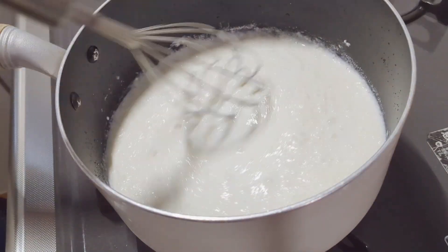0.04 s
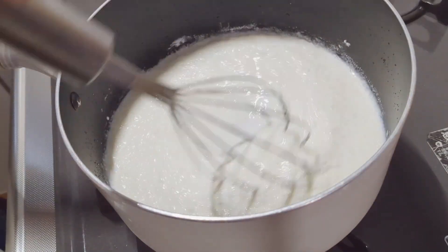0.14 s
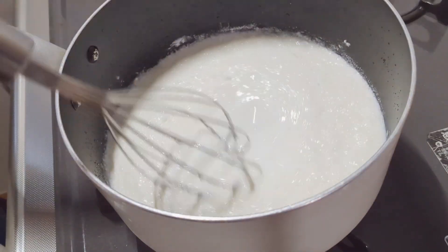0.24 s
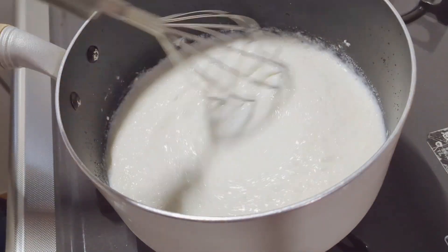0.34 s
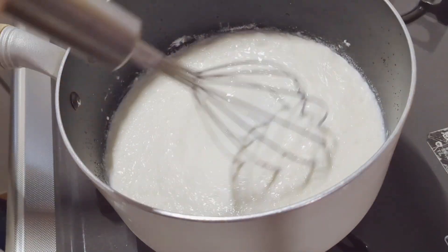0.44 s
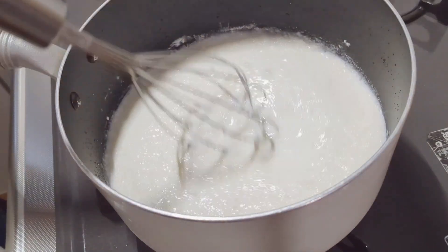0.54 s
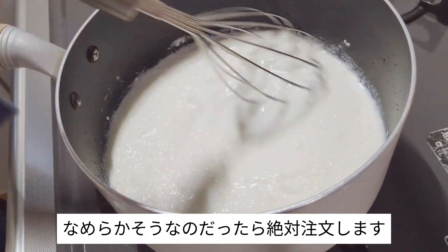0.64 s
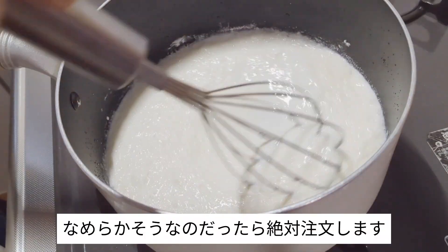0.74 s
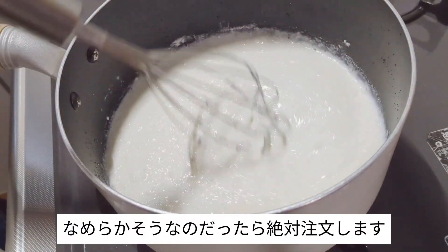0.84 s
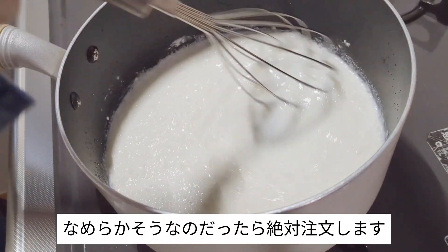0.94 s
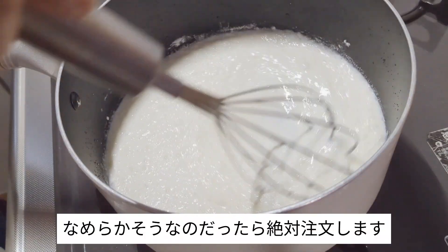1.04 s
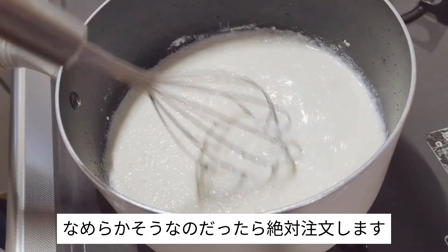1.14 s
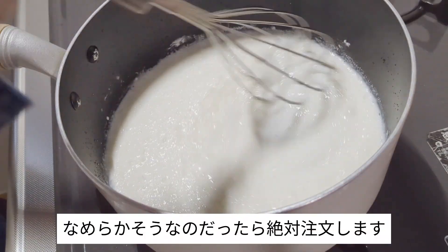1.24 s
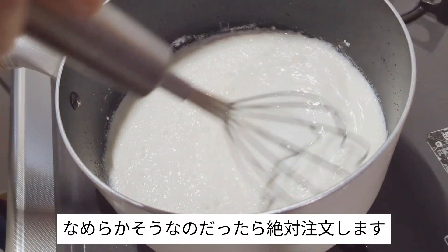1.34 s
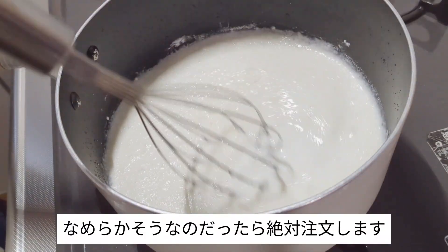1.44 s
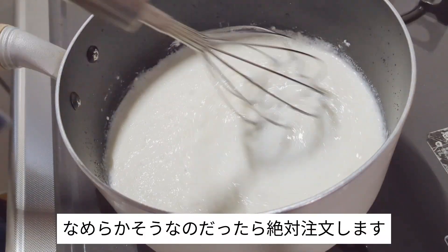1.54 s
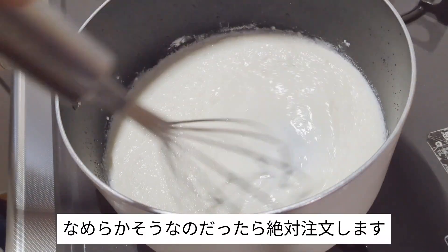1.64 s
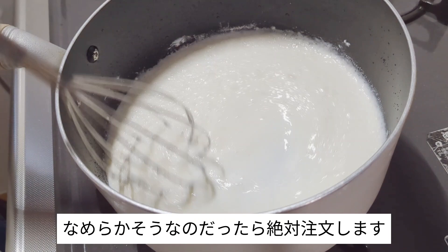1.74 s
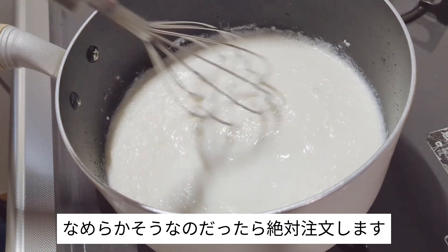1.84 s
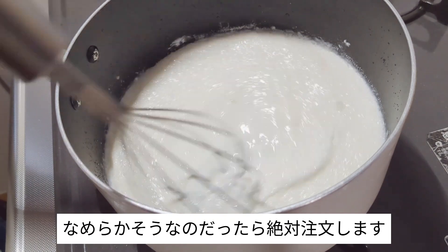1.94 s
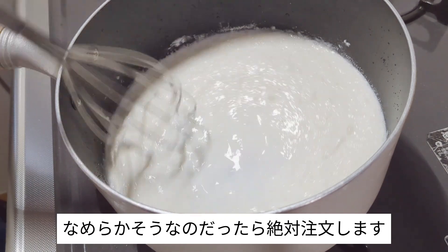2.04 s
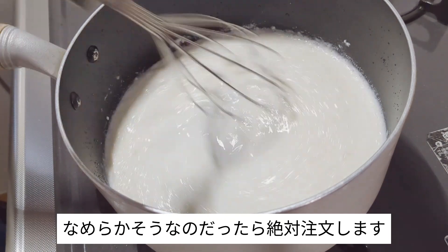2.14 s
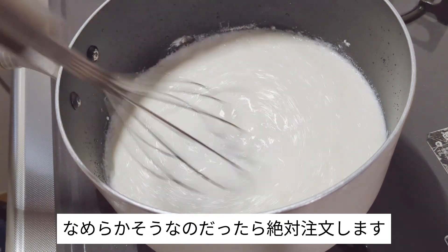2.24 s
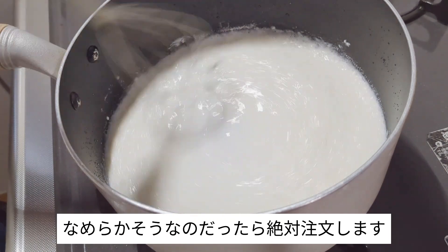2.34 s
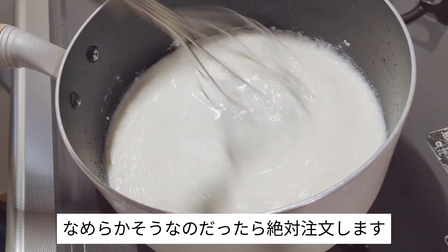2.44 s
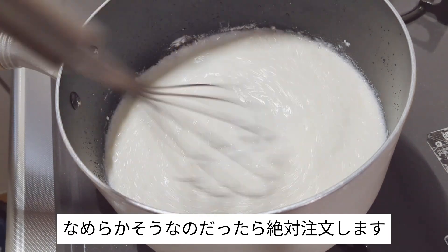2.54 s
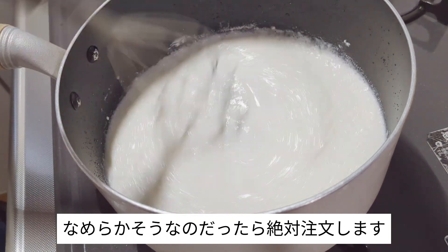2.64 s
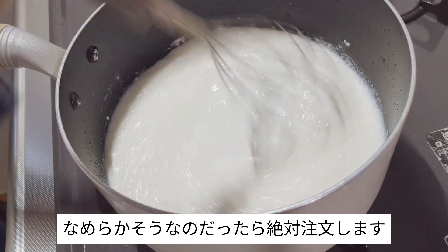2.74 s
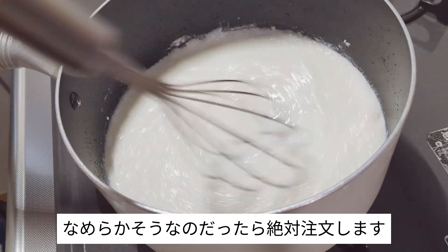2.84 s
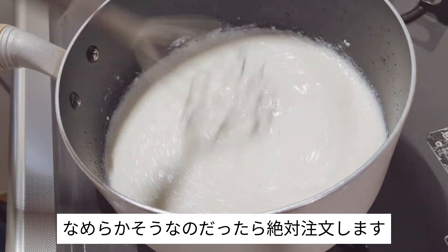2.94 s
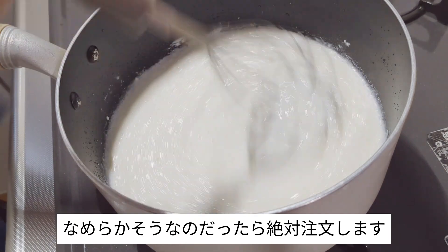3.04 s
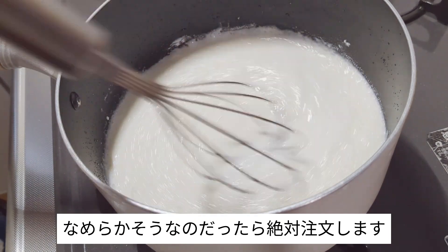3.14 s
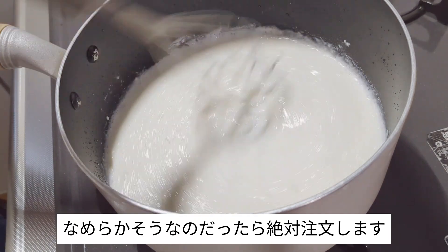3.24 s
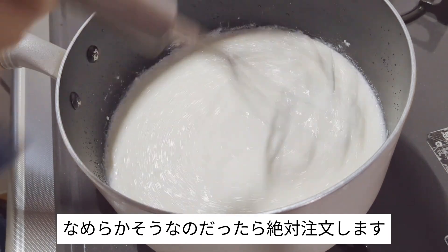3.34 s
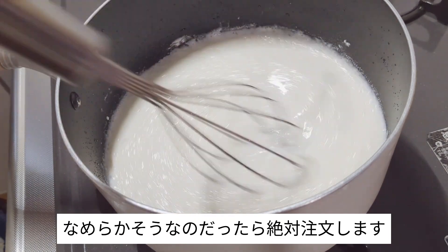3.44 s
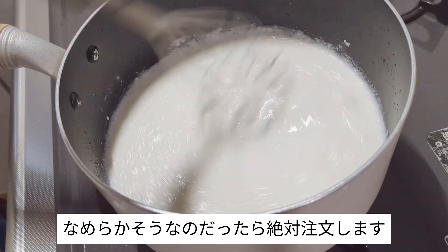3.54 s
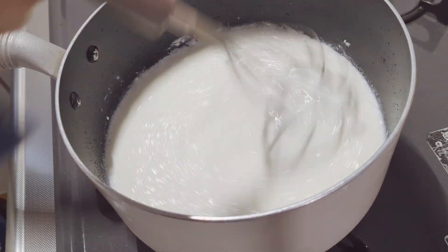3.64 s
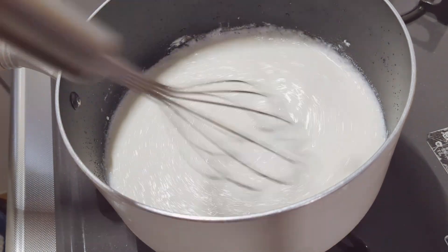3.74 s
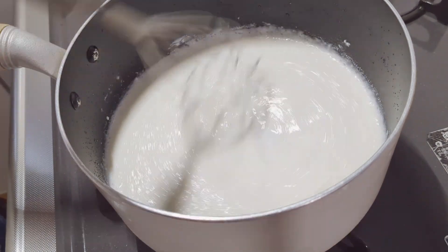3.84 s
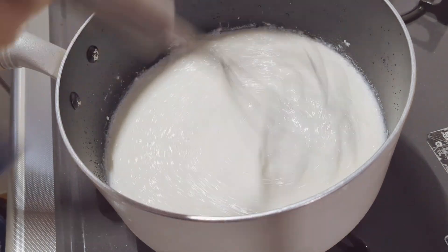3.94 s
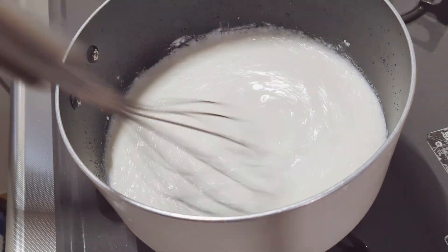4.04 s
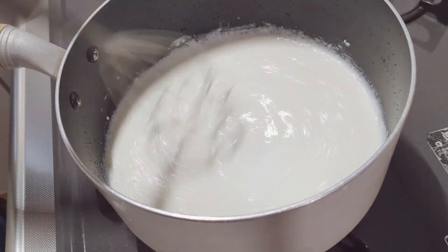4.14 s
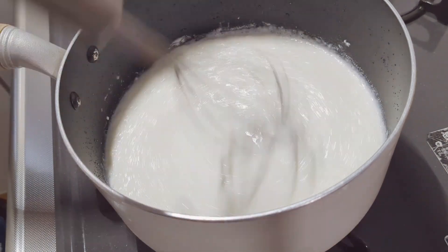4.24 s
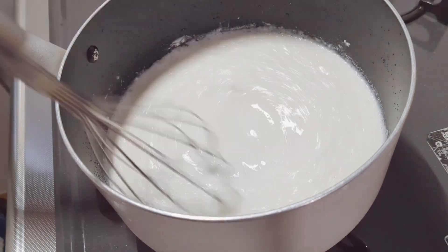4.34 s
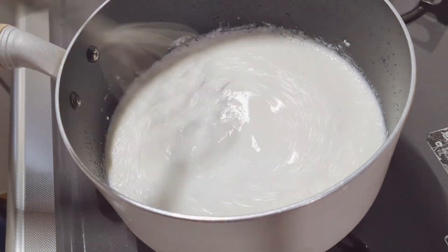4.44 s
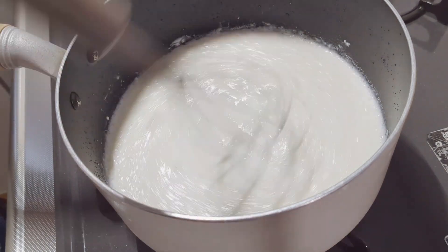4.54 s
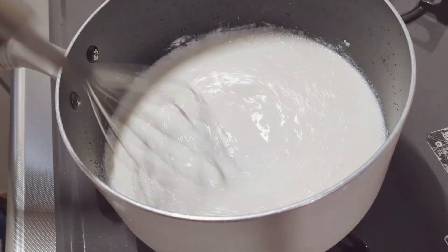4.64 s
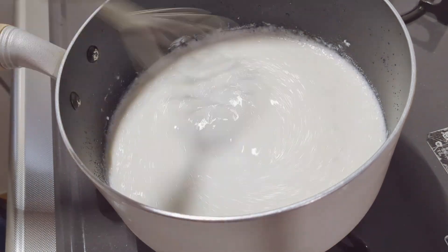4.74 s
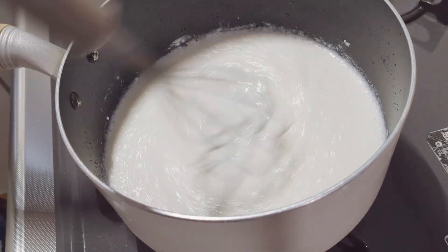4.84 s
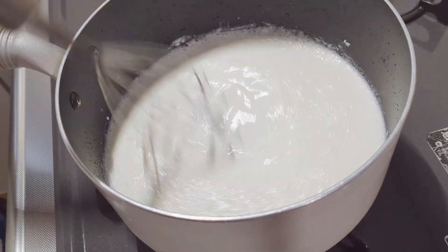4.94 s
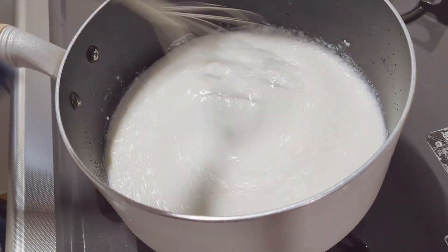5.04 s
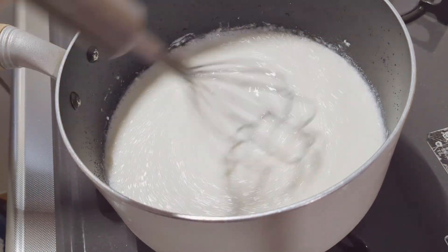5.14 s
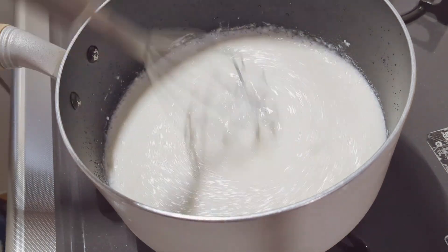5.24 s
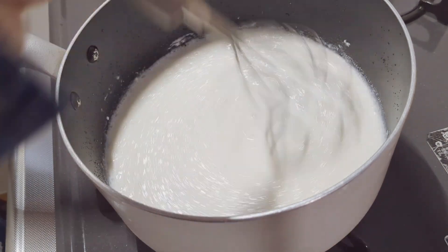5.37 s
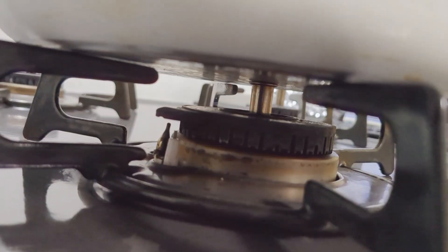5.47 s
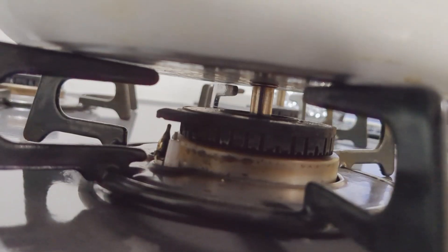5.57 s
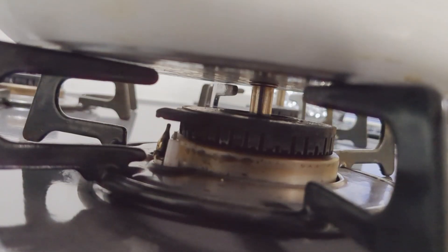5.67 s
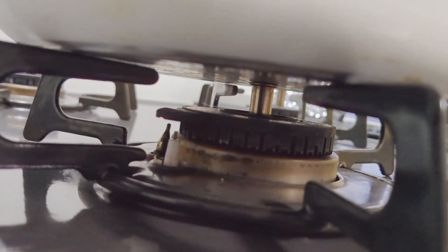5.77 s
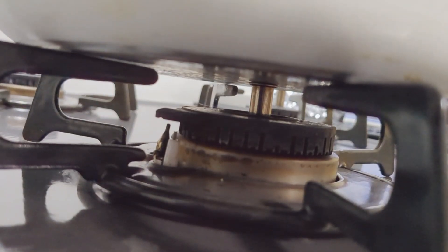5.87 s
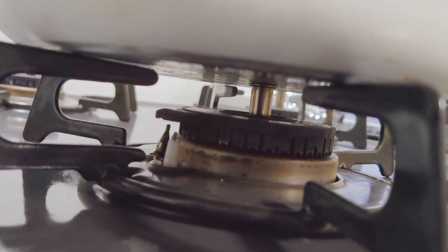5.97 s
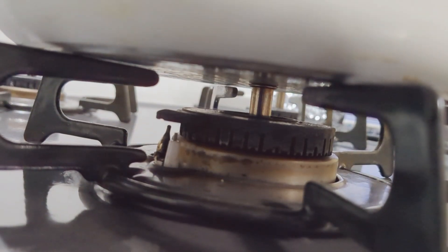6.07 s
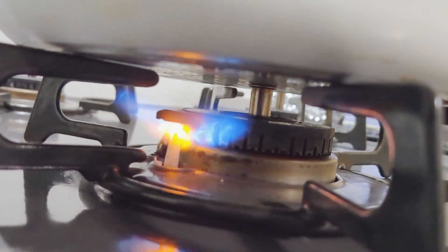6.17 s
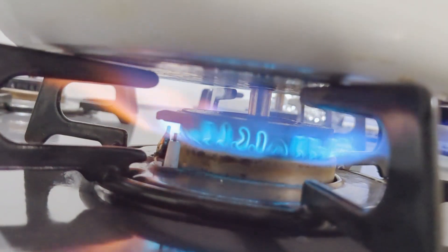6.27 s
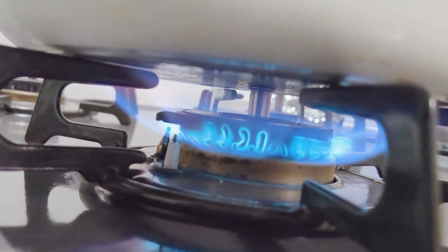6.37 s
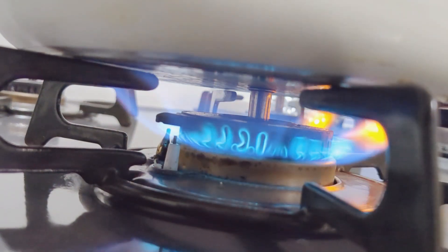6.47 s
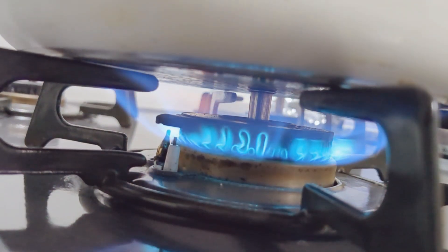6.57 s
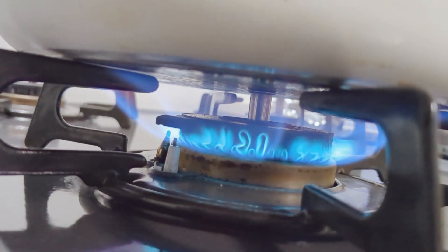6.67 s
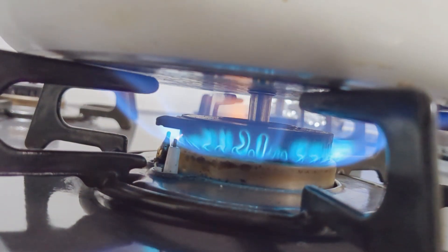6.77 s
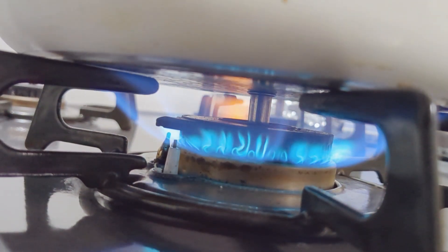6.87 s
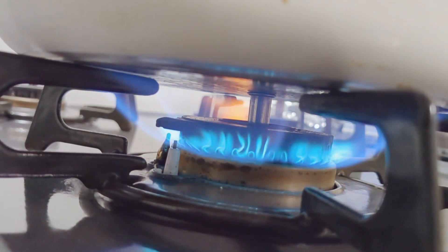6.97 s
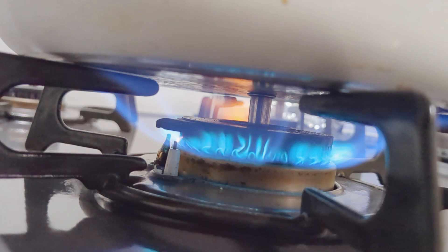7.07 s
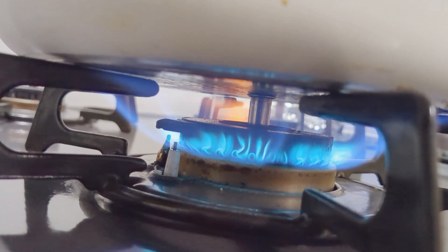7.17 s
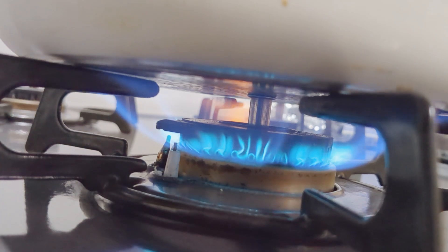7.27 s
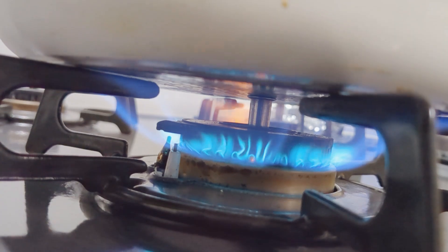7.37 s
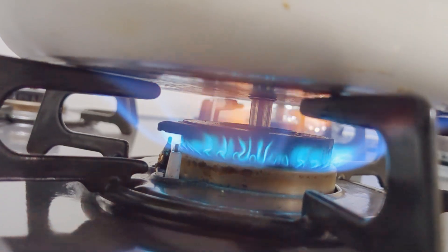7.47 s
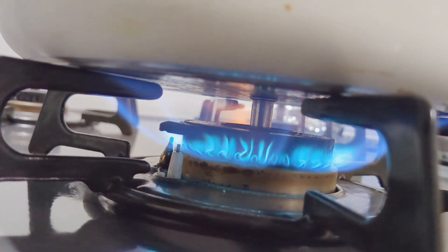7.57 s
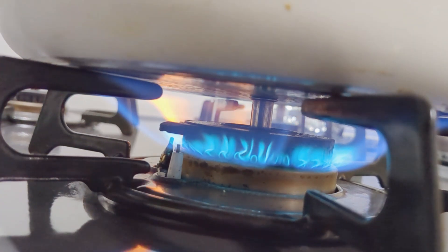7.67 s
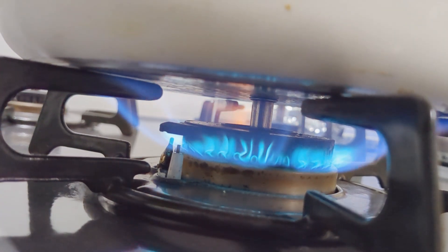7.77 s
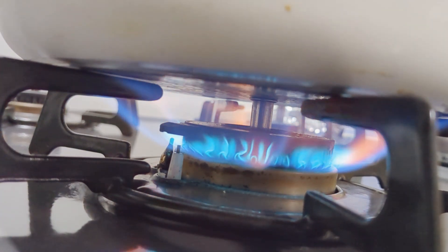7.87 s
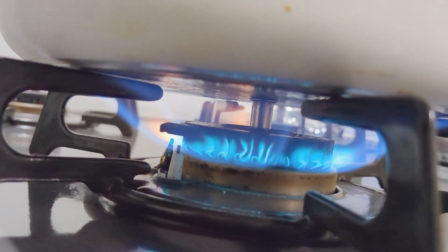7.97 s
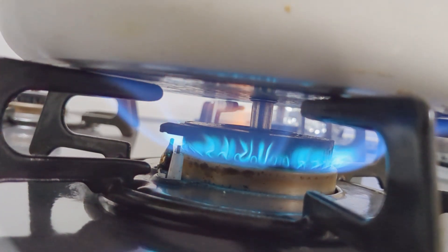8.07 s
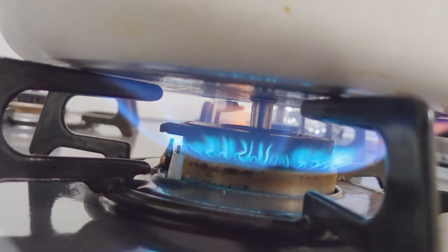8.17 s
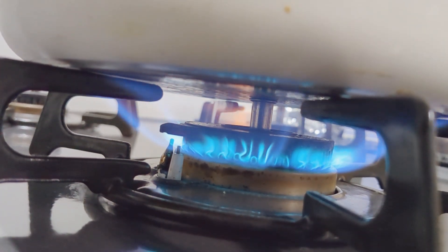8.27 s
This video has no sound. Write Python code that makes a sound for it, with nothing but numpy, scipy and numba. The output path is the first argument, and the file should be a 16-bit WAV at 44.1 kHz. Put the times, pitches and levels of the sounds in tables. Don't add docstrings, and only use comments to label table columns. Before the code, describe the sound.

Very close stereo pickup above a hob: short metallic scrapes of a whisk, pan wall humming, wires chattering against it and the pan jolting, becoming quicker and more regular. A tiny silence, then plastic and steel clacks booming in the casing, thin gas hiss, a hard ignition pop, regular loud spark cracks and a low settling flame roar.

```python
import sys
import numpy as np
from scipy import signal
from scipy.fft import rfft, irfft, next_fast_len
from scipy.io import wavfile
from scipy.ndimage import uniform_filter1d
from numba import njit

SR = 44100
rng = np.random.default_rng(int(sys.argv[2]) if len(sys.argv) > 2 else 0)


def materialize(psi):
    bounded = np.clip(np.atleast_2d(psi).T, -1, 1)
    quanta = np.round(bounded * 32767).astype(np.int16)
    wavfile.write(sys.argv[1], SR, quanta)


def gain_from_decibels(decibels):
    exponent = np.asarray(decibels, float) / 20
    return 10 ** exponent


N = 366471
T = np.arange(N) / SR
SIDES = np.array([[.5], [-.5]])
CUT_S, GAP_S = 5.474, .014

# start t/s, length t/s, pan hum level/dB, wire hiss
# level/dB, main wall mode f/Hz
STIRS = [(0.0, 0.17, -46.5, -55.5, 1230), (0.14, 0.078, -48.5, -46.5, 1262),
         (0.286, 0.17, -48.5, -55.5, 1270), (0.427, 0.096, -52.5, -47, 1250),
         (0.549, 0.16, -47.5, -52, 1273), (0.717, 0.088, -50.5, -45, 1185), (0.858, 0.13, -46.5, -48, 1310),
         (1, 0.038, -50, -46.5, 1190), (1.091, 0.083, -53.5, -47.5, 1304), (1.191, 0.069, -45, -44.5, 1360),
         (1.42, 0.0086, -47, -41, 1303), (1.457, 0.12, -45, -45.5, 1347), (1.614, 0.076, -45.5, -45, 1210),
         (1.721, 0.12, -47, -44.5, 1350), (1.849, 0.089, -48.5, -62, 1305), (1.93, 0.021, -51, -52, 1274),
         (2.009, 0.081, -45.5, -49, 1304), (2.074, 0.11, -46.5, -38.5, 1410),
         (2.27, 0.013, -46, -50.5, 1230), (2.31, 0.12, -46.5, -47, 1236), (2.478, 0.081, -44.5, -42, 1200),
         (2.618, 0.14, -48.5, -49, 1224), (2.79, 0.08, -54.5, -51, 1220), (2.854, 0.076, -52.5, -58, 1220),
         (2.938, 0.092, -45, -50, 1220), (3.042, 0.097, -49.5, -45, 1220), (3.14, 0.043, -55, -52, 1220),
         (3.221, 0.15, -47, -50.5, 1234), (3.379, 0.11, -54, -49.5, 1238), (3.508, 0.13, -46, -47.5, 1310),
         (3.668, 0.045, -61, -41.5, 1200), (3.778, 0.0079, -43, -49.5, 1280),
         (3.832, 0.093, -45, -45.5, 1238), (3.968, 0.083, -52, -44.5, 1210),
         (4.088, 0.13, -46, -45.5, 1218), (4.388, .12, -45.5, -48.5, 1271),
         (4.52, 0.029, -50.5, -48.5, 1236), (4.653, 0.1, -45, -44.5, 1220),
         (4.818, 0.038, -45.5, -44.5, 1260), (4.928, 0.13, -46, -51, 1178),
         (5.11, 0.044, -45.5, -33.5, 1144), (5.201, 0.049, -45.5, -49, 1230),
         (5.281, 0.085, -44, -50, 1214), (5.413, 0.034, -46.5, -39, 1230)]
DRAGS = STIRS
# t/s, peak level/dB, chatter t60/s, left minus right level/dB
CLINKS = [(1.025, -23, 0.14, 4), (1.4301, -23, 0.023, 4), (1.8195, -19.5, 0.12, 2),
          (2.014, -28.5, 0.072, 3), (2.0855, -13, 0.065, 1), (2.0947, -11, 0.032, 14),
          (2.1017, -23.5, 0.047, -3), (2.113, -12, 0.03, -5), (2.145, -14, 0.03, -3),
          (2.152, -17, 0.02, 1.5), (2.4733, -10.5, 0.074, 1), (2.7898, -18, 0.058, 4),
          (3.0897, -17, 0.056, 1.5), (3.3864, -20, 0.054, 5), (3.6776, -15.5, 0.08, 1),
          (4.4, -30.5, 0.055, 3.5), (4.6591, -26.5, 0.046, -0.5), (4.832, -31.5, 0.014, 3),
          (4.9355, -32, 0.067, 3), (5.1115, -9, 0.097, 3), (5.1282, -4, 0.032, -2.5),
          (5.222, -24.5, 0.03, 3.5), (5.4254, -17, 0.072, 1)]
# f/Hz, width f/Hz, level/dB, share of the bending as milk and wires load the wall
PAN = [(265.6, 14, -19, 0.66), (508.7, 40.6, -8, -.2), (674, 51, -5.5, 0.48), (1038, 65, -5, -0.35),
       (1080, 210, -15.5, 0.81), (1220, 82, -1.5, 1), (1469, 320, -11.5, -0.14), (1657, 67, -8, -0.095),
       (1810, 110, -11, 0.6), (2040, 141, -10.5, 0.11), (2461, 130, -23.5, 0), (2636, 124, -8, 0.37),
       (3007, 230, -11.5, 0.38), (4155, 69, -9.5, -0.16)]
# f/Hz, t60/s
HOB_TAIL = [(500, 0.082), (1300, 0.18), (3000, 0.33), (8000, 0.26), (16000, 0.2)]


def unit(x):
    return x / np.sqrt(np.mean(x ** 2))


def colour(x, shape):
    size = next_fast_len(x.shape[-1])
    f, db = np.transpose(shape)
    hz = np.maximum(np.arange(size // 2 + 1) * SR / size, 1)
    gain = gain_from_decibels(np.interp(np.log(hz), np.log(f), db))
    return irfft(rfft(x, size) * gain, size)[..., :x.shape[-1]]


def noise(shape, alike):
    mid, side = unit(colour(rng.standard_normal((2, N)), shape))
    alike = np.clip(alike, 0, 1)
    return np.sqrt((1 + alike) / 2) * mid + np.sqrt((1 - alike) / 2) * side * 2 * SIDES


def walk(rate, count=1, step=1):
    k = max(int(SR / rate / step), 1)
    size = -(-N // step)
    held = np.repeat(rng.standard_normal((count, N // 300))[:, :size // k + 1], k, axis=1)
    return 1.5 * uniform_filter1d(uniform_filter1d(held, k), k)[:, :size]


def bursts(s, db, t60, rise=0.000065):
    out = np.zeros(N)
    for start, gain, length in zip(s, gain_from_decibels(np.asarray(db)), np.clip(t60, .004, .6)):
        i = int(start * SR)
        t = np.arange(min(int(length * SR), N - i)) / SR
        out[i:i + len(t)] += gain * (1 - np.exp(-t / rise)) * 1000 ** (-t / length)
    return out


def knocks(s, db, hz, t60, rise=0.0064):
    out = 0
    for start, level_db, f, length in zip(s, db, hz, t60):
        out = out + bursts([start], [level_db], [length], rise) * np.sin(2 * np.pi * f * (T - start))
    return out


@njit
def resonate(x, poles, reach, heard):
    out = np.zeros((2, len(x)))
    for k in range(len(poles)):
        z, w, slack = 0j, 0j, 1 - abs(poles[k, 0])
        for i in range(len(x)):
            z = z * poles[k, i >> 6] + x[i] * reach[k, i >> 6] + 1e-18
            w = w * poles[k, i >> 6] + z * slack
            out[0, i] += (w * heard[0, k, i >> 6]).imag
            out[1, i] += (w * heard[1, k, i >> 6]).imag
    return out


def ring(x, modes, wander_db, rate, turns, drift, bend=1, lift_db=0, slips=10):
    hz, width, db = np.transpose(modes)[:3, :, None]
    moving = hz * bend * (1 + drift * walk(5, count=len(hz), step=64))
    poles = np.exp((2j * moving - width) * np.pi / SR)
    gain = gain_from_decibels(db) * width
    gain /= np.sqrt(np.sum(gain ** 2 / width) * SR / (8 * np.pi))
    own = walk(slips, count=len(hz), step=64)
    between = walk(slips, count=len(hz), step=64)
    heard = gain * np.exp(2j * np.pi * turns * (own + between * SIDES[:, :, None]))
    reach = gain_from_decibels(lift_db + wander_db * walk(rate, count=len(hz), step=64))
    out = resonate(x, poles, reach, heard)
    return np.pad(out, ((0, 0), (0, N - len(x))))


def tail(decays, wait_s, build_s):
    t = np.arange(SR // 2) / SR
    hz, t60 = np.transpose(decays)
    out = 0
    for centre in 90 * 2 ** np.arange(0, 8, .5):
        shape = [(centre / 2, -60), (centre / 1.4, -9), (centre, 0), (centre * 1.4, -9), (centre * 2, -60)]
        band = colour(rng.standard_normal((2, len(t))), shape)
        out = out + band * 1000 ** (-t / np.interp(np.log(centre), np.log(hz), t60))
    out *= np.clip((t - wait_s) / build_s, 0, 1)
    return out / np.sqrt(np.sum(out ** 2) / 2)


def echo(x, response):
    return signal.fftconvolve(x, response, axes=1)[:, :N]


def drags(db, fade_db_s):
    press_s = 0.018
    power = np.full(N // 64 + 1, 1e-12)
    t = np.arange(len(power)) * 64 / SR
    for (s, length, *_), top in zip(DRAGS, db):
        press = np.clip((t - s) / press_s, 0, 1) if s > 0 else 1
        power += (press * gain_from_decibels(top - fade_db_s * np.maximum(t - s - length, 0))) ** 2
    return np.interp(T, t, np.sqrt(power))


def singing():
    singers = (3, 5, 7, 9)
    unsung_db = [-56.5, -54.5, -60.5, -59.5]
    # start t/s, length t/s, level/dB
    sing_low = [(0.155, 0.032, -50.5), (1.63, 0.027, -52.5), (2.01, 0.031, -50), (2.275, 0.15, -47.5),
                (2.63, 0.066, -53.5), (4.18, 0.1, -46), (4.726, 0.031, -52), (.1, 0.033, -45),
                (5.23, .16, -53)]
    sing_main = [(0.145, 0.021, -49.5), (0.31, 0.052, -50.5), (0.905, 0.028, -48), (1.21, 0.066, -43),
                 (1.512, 0.073, -47), (1.647, 0.072, -53), (2.01, 0.054, -48.5), (2.08, 0.04, -68),
                 (2.322, 0.048, -45), (2.647, 0.033, -40), (2.96, 0.049, -51), (3.246, 0.038, -45),
                 (3.543, 0.032, -49), (3.848, 0.029, -51), (4.106, 0.098, -49), (4.395, 0.092, -45),
                 (4.682, 0.016, -48),
                 (.44, 0.038, -47), (.67, 0.042, -49), (.79, .03, -46), (1.425, 0.015, -40.5),
                  (1.47, 0.023, -57), (3.33, 0.023, -48)]
    sing_mid = [(0.019, 0.058, -55.5), (0.135, 0.051, -58), (0.921, 0.094, -56), (1.557, 0.03, -60),
                (1.613, 0.027, -52), (1.905, 0.031, -54), (2.04, 0.062, -64), (2.144, 0.082, -56),
                (2.324, 0.13, -55), (2.507, 0.057, -58), (2.649, 0.116, -52), (3.068, 0.029, -48),
                (3.517, 0.065, -51.5), (3.655, 0.048, -56), (3.846, 0.023, -49.5), (3.904, 0.072, -52),
                (3.976, 0.031, -50), (4.13, 0.086, -54), (4.511, 0.054, -64), (4.692, 0.071, -59),
                (4.828, 0.046, -49.5), (4.964, 0.028, -59)]
    sing_high = [(0.785, 0.031, -45), (0.903, 0.032, -53), (1.19, 0.05, -52), (1.512, 0.065, -52.5),
                 (1.729, 0.12, -46), (2.02, 0.049, -54), (2.084, 0.027, -60), (2.186, 0.044, -45.5),
                 (2.378, 0.047, -49), (2.475, 0.071, -64), (2.553, 0.038, -51), (3.511, 0.075, -49.5),
                 (3.842, 0.037, -53), (4.118, 0.073, -49), (4.419, 0.015, -48), (4.662, 0.1, -50.5),
                 (4.828, 0.042, -46.5)]
    t = T[::64]
    lift_db = np.zeros((len(PAN), len(t)))
    tables = (sing_low, sing_main, sing_mid, sing_high)
    for row, table, plain_db in zip(singers, tables, unsung_db):
        for s, length, db in table:
            locked = np.clip(np.minimum(t - s, s + length - t) / .02 + 1, 0, 1)
            lift_db[row] += (db - plain_db) * locked
    return lift_db


def strikes():
    # t/s, peak level/dB
    ticks = [(0.0316, -31), (0.1531, -45), (0.438, -37.5), (0.88, -55), (1.0914, -38), (1.1568, -37),
             (1.6262, -57), (1.931, -37), (1.9575, -27), (2.2797, -51), (2.2927, -37.5), (2.3241, -46),
             (2.4902, -11), (2.8574, -40), (2.9721, -42), (3.0183, -29.5), (3.0799, -33), (3.2722, -28.5),
             (3.4431, -30), (3.516, -41), (3.5603, -30), (3.6396, -35), (3.7884, -28), (3.8516, -54),
             (3.9785, -37), (4.4667, -45), (4.572, -34), (4.6947, -35), (4.706, -23.5), (4.945, -40),
             (4.977, -38.5), (5.1162, -11), (5.1202, -8), (5.2287, -29.5), (5.3078, -41), (5.364, -29),
             (5.4036, -37)]
    s, db, t60, _ = np.transpose(CLINKS)
    chatter = bursts(s, db - 13.5, t60) * gain_from_decibels(walk(120)[0])
    blow = bursts(s, db - 26.0, t60 / 5)
    tick_s, tick_db = np.transpose(ticks)
    return chatter + blow + bursts(tick_s, tick_db - 11, 0.025 + 0 * tick_s)


def whisk():
    # f/Hz, width f/Hz, level/dB
    wire_modes = [(4250, 70, -10), (5205, 90, 3), (5400, 60, -5), (6085, 90, -11), (6475, 70, -7),
                  (6760, 70, -3), (7870, 100, -15), (9040, 70, -3), (9380, 100, -6), (9940, 80, -6),
                  (10470, 80, -10), (11590, 100, -6), (11940, 90, -6), (13700, 140, -12)]
    # f/Hz, level per Hz/dB
    grit_shape = [(1470, -33.5), (2300, -4.5), (4210, -4.5), (5490, -4), (11800, -6.5), (15300, -14),
                  (17000, -46.5)]
    # f/Hz, level per Hz/dB
    strike_shape = [(590, -53), (1000, -8), (3510, -3.5), (5260, -0.5), (9290, 4.5), (15300, -2),
                    (17000, -52.5)]
    shot = int(CUT_S * SR)
    start, length, hum_db, hiss_db, wall_hz = np.transpose(DRAGS)
    judder = gain_from_decibels(1.6 * walk(30, count=2))
    hum = drags(hum_db, 213.5) * judder[0]
    hiss = drags(hiss_db, 288.5) * judder[1]
    grit = unit(rng.standard_normal(N) * gain_from_decibels(2 * rng.exponential(size=N)))
    slip = grit * gain_from_decibels(1.1 * walk(70)[0])
    strike = strikes()

    wander_db, drift, low_turns = 1.4, .016, .17
    bend = (np.interp(T[::64], start + length / 2, wall_hz) / 1220) ** np.array(PAN)[:, 3:]
    pan_drive = slip * hum * gain_from_decibels(-1.4) + grit * strike * gain_from_decibels(-19.5)
    pan = ring(pan_drive[:shot], PAN, wander_db, 16, low_turns, drift, bend, singing())

    dragged = (slip * hiss * gain_from_decibels(-7.0))[:shot]
    wires = ring(dragged, wire_modes, wander_db * 2.2, 22, 2 * low_turns, drift / 6, slips=6)
    struck = (grit * strike * gain_from_decibels(-0.5))[:shot]
    broad_modes = wire_modes * np.array([1, 2.2, 1])
    wires = wires + ring(struck, broad_modes, 3.3, 22, 3 * low_turns, drift / 10)

    crowd_hz = np.geomspace(2250, 16200, num=32)
    grit_hz, grit_db = np.transpose(grit_shape)
    crowd_db = np.interp(np.log(crowd_hz), np.log(grit_hz), grit_db)
    crowd_modes = np.c_[crowd_hz, .13 * crowd_hz, crowd_db]
    crowd_drive = (slip * hiss * gain_from_decibels(-1.0))[:shot]
    crowd = ring(crowd_drive, crowd_modes, wander_db / 2, 40, 0.53, drift, 0.98, slips=45)

    rattle = noise(strike_shape, 0.071) * strike * gain_from_decibels(-1.0)
    clink_s, _, _, side_db = np.transpose(CLINKS)
    lean = gain_from_decibels(np.interp(T, clink_s, side_db) * SIDES)
    near = pan * gain_from_decibels(0.43 * SIDES) + (wires + crowd + rattle) * lean + thuds()
    return np.array([near[0], np.roll(near[1], 5)])


def rumble():
    # f/Hz, level per Hz/dB
    rumble_shape = [(25, -21.5), (48, -3.5), (113, 4.5), (175, 1), (205, -16.5), (330, -12.5), (430, -37),
                    (730, -120)]
    return noise(rumble_shape, 1.0) * gain_from_decibels(-67 + 6 * SIDES + 0.5 + 2 * walk(42)[0])


def thuds():
    # t/s, peak level/dB, f/Hz, t60/s
    jolts = [(1.031, -48, 180, 0.7), (1.066, -35.5, 265, 0.1), (1.434, -39, 182.6, 0.36),
             (2.186, -37.5, 113.5, 0.5), (2.494, -40.5, 274.5, 0.42), (2.8, -41, 112.5, 0.36),
             (3.095, -37, 258.7, 0.3), (3.393, -31.5, 249, 0.14), (3.68, -36, 260.4, 1),
             (5.118, -35.5, 253, 0.31), (5.431, -34, 234, 0.2)]
    s, db, hz, t60 = np.transpose(jolts)
    shake = noise([(80, -6.5), (180, -2.0), (600, -10.0), (900, -19.0)], 0.39)
    shake = shake * bursts(s, db - 5.5, t60 / 2, rise=.005)
    tones = knocks(s, db, hz, 1.3 * t60) * gain_from_decibels(4.9 * walk(70)[0] - 10.0)
    return (tones + shake) * gain_from_decibels(1.3 * SIDES)


def knob():
    # t/s, peak level/dB, t60/s, relative body level/dB, left minus right level/dB
    moves = [
        (5.4886, -22.5, 0.14, -11, -1.5),
        (5.677, -50.5, 0.72, 14, -5),
        (5.7106, -21.5, 0.32, -9, -4.5),
        (5.7242, -17, 0.064, -5, 0.5),
        (5.863, -38, 0.093, 11.5, -6),
        (5.893, -39.5, 0.18, -5, 2),
        (5.942, -31, 0.1, -1, -19),
        (5.9501, -24, 0.2, -16, 1.5),
    ]
    # f/Hz, level per Hz/dB
    clack_shape = [(470, -12.5), (800, -8.5), (1880, -6), (3620, -6.5), (5880, -10.5), (13000, -7),
                   (15700, -15), (17000, -52)]
    # f/Hz, width f/Hz, level/dB
    casing_modes = [(221.5, 49, -4.5), (329, 65, -7), (613, 59, -5), (720, 130, -11.5), (1030, 85, -23)]
    spring_modes = [(9640, 200, -6), (13125, 180, 5), (13330, 150, -3), (13900, 270, -6)]
    # t/s, peak level/dB, t60/s, relative level of upper modes/dB
    booms = [(5.49, -44.5, .3, -4), (5.51, -48, 0.17, -12), (5.6, -61, 0.17, -7), (5.68, -51.5, .3, -1.5),
             (5.719, -39.5, 0.11, 0), (5.755, -56, 0.14, -4), (5.815, -52, 0.13, 1),
             (5.864, -46, 0.29, -10), (5.94, -48, .1, -7), (5.954, -50.5, .2, -1.5),
             (5.979, -53, 0.13, -16)]
    s, db, t60, body_db, side_db = np.transpose(moves)
    hiss = noise(clack_shape, 0.028)
    dull = colour(hiss, [(3500, 2.0), (5500, -30)])
    edge_db = -0.63 * (body_db + 9.5)
    clack = dull * bursts(s, db - edge_db / 2 - 14, 0.87 * t60)
    clack = clack + (hiss - dull) * bursts(s, db + edge_db - 10, 0.55 * t60)
    clack = clack * gain_from_decibels(walk(100)[0] + np.interp(T, s, side_db) * SIDES)

    jolt = rng.standard_normal(int(6.3 * SR))
    at, boom_db, boom_t60, upper_db = np.transpose(booms)
    boom = 0
    for level_db, modes in ((boom_db, casing_modes[:2]), (boom_db + upper_db, casing_modes[2:])):
        push = bursts(at, level_db, boom_t60, 0.0018)[:len(jolt)]
        boom = boom + ring(jolt * push, modes, 0.93, 15, 0.093, 0.011)

    casing = noise([(25, -13), (60, 2.5), (300, -4), (800, -6.5), (2000, -32)], 0.88)
    casing = casing * bursts(s, db + body_db - 25.0, 3.1 * t60, 0.007)
    twang = bursts(s, db + edge_db - 20, 0.53 * t60)[:len(jolt)]
    spring = ring(jolt * twang, spring_modes, 1.5, 20, 0.37, .002)
    return clack + casing + boom + spring


def gas():
    # f/Hz, level per Hz/dB
    jet_shape = [(710, -39), (1200, -14), (1850, -1.5), (3000, -13.5), (10500, -11), (11700, 5),
                 (12800, -12), (17000, -12)]
    valve_s, opening_s = 5.94, .04
    opened = np.clip((T - valve_s) / opening_s, .1, 1)
    return noise(jet_shape, 0.092) * opened * gain_from_decibels(-73 - 0.5 * (T - valve_s))


def flame():
    # t/s, roar level/dB
    sizes = [
        (6.27, -94),
        (6.33, -55),
        (6.46, -69),
        (6.84, -76.5),
        (7.76, -71.5),
        (8.31, -87),
    ]
    # f/Hz, level per Hz/dB
    roar_shape = [(25, -26), (102, 4), (156, -4.5), (205, 3), (318, -8.5), (384, -2.5), (650, -29),
                  (1100, -120)]
    # t/s, peak level/dB, t60/s
    catches = [(6.298, -33, 0.063), (6.307, -31, 0.057), (6.318, -34, 0.036), (6.34, -37, .05),
               (6.351, -30, .05), (6.363, -36, .04), (6.385, -40, 0.064), (6.401, -39, 0.051),
               (6.42, -34.5, 0.034), (6.446, -40.5, 0.07), (6.462, -40, 0.063), (6.486, -35, 0.053),
               (6.499, -44.5, 0.043)]
    # f/Hz, level per Hz/dB
    catch_shape = [(40, -9), (248, -3), (520, -17.5), (760, -9.5), (1540, -26), (2600, -30.5), (6600, -120)]
    size_s, roar_db = np.transpose(sizes)
    roar = gain_from_decibels(np.interp(T, size_s, roar_db))
    roar = roar + gain_from_decibels(-76.5)
    lower = noise(roar_shape, 0.93) * gain_from_decibels(2 * walk(22)[0])
    upper = noise([(150, -38), (300, 1.0), (600, -4.5), (1200, -5.5), (2500, -26.0)], 0.3)
    burning = roar * (lower + upper * gain_from_decibels(-4.5 + 2 * walk(34)[0]))
    s, db, t60 = np.transpose(catches)
    burning = burning + noise(catch_shape, 0.82) * bursts(s, db - 7.0, t60, 0.0011)
    return burning * gain_from_decibels(2.9 * SIDES)


def puffs():
    # t/s, peak level/dB, left minus right level/dB
    fronts = [
        (6.2778, -9.5, 17),
        (7.2015, -33, 8),
    ]
    out = 0
    for s, db, side_db in fronts:
        t = np.maximum(T - s, 1e-6) / .0006
        swing = -np.cos(np.pi * np.log(t) / np.log(2.3))
        swing = swing * np.clip(t, 0, 1) ** 2 / (1 + (t / 2.1) ** 0.78) * np.exp(-t / 80)
        snap = knocks([s], [-7.5], [2460], [0.0036], rise=.0001)
        out = out + (swing - snap) * gain_from_decibels(db + side_db * (SIDES - .5))
    return out


def igniter():
    # t/s, level/dB, left minus right level/dB
    sparks = [(6.278, -7.4, 1.0), (6.4313, -8.6, -2.5), (6.5853, -9.0, -2.4), (6.7396, -9.0, -1.4),
              (6.8937, -10.6, -0.5), (7.0479, -10.0, -1.3), (7.2018, -9.3, -1.9), (7.3563, -6.8, -0.7),
              (7.5093, -7.2, -0.4), (7.6622, -7.4, -0.6), (7.8168, -8.3, -0.8), (7.9712, -7.4, -1.1)]
    # f/Hz, level per Hz/dB
    spark_shape = [(300, -35.5), (1900, -15), (2400, -19), (6000, -9), (7000, -4.5), (12200, 2.5),
                   (15700, -6), (17000, -7)]
    # left t/ms, left level/dB, right t/ms, right level/dB
    bounces = [(.05, -4.5, .18, -9), (.3, -13, .78, 0), (.95, -5.5, 1.12, -10), (1.25, -11, 1.45, -10),
               (1.9, -10, 1.97, -13), (2.05, -10, 2.42, -10), (2.5, -11, 3.02, -7), (4.4, -17, 3.9, -15),
               (5.8, -16, 5.5, -18)]
    s, db, side_db = np.transpose(sparks)
    db = db + 1
    clicks = np.zeros((2, N))
    clicks[:, (s * SR).astype(int)] = gain_from_decibels(db + (side_db + 1) * SIDES)
    near = np.zeros((2, SR // 2))
    for left_ms, left_db, right_ms, right_db in bounces:
        near[0, round(left_ms * SR / 1000)] += gain_from_decibels(left_db)
        near[1, round(right_ms * SR / 1000)] += gain_from_decibels(right_db)
    spread = bursts(s, db - 19, 0.025 + 0 * s) + bursts(s + 0.0069, db - 37.5, 0.22 + 0 * s)
    scatter = colour(rng.standard_normal((2, N)) * spread, [(1500, 7.5), (4000, 0.5)])
    steel_shape = [(1300, -5), (2300, 5), (4000, 5.5), (7000, -2), (14000, -4)]
    ringing = gain_from_decibels(-3) * colour(tail(HOB_TAIL, 0.0016, 0.015), steel_shape)
    return colour(echo(clicks, near + ringing) + scatter, spark_shape) * gain_from_decibels(8)


def scene():
    # f/Hz, t60/s
    kitchen = [(300, 0.21), (1300, 0.35), (4000, 0.085), (8000, 0.091), (16000, 0.3)]
    # f/Hz, level per Hz/dB
    air = [(150, -40), (500, 15.5), (1500, 6), (3000, -21), (15000, -24.5)]
    metal = whisk()
    room = gain_from_decibels(-20) * echo(metal, tail(kitchen, 0.009, 0.025))
    stirring = metal + rumble() + room + noise(air, .2) * gain_from_decibels(-66.5)
    clacks = knob()
    hob = clacks + gain_from_decibels(-13) * echo(clacks, tail(HOB_TAIL, 0.0015, 0.0013))
    hob = hob + gas() + flame() + puffs() + igniter()
    self_noise = gain_from_decibels(-79) * rng.standard_normal((2, N))
    before = np.clip((CUT_S - T) / .001, 0, 1)
    after = np.clip((T - CUT_S - GAP_S) / .001, 0, 1)
    return (stirring + self_noise) * before + (hob + self_noise) * after


def band_limit(x):
    return signal.sosfilt(signal.butter(12, 17160, fs=SR, output="sos"), x)


def record(dry):
    # f/Hz, level/dB
    top_cut = [(15700, 0), (16000, -16), (16900, -20), (17300, -55)]
    return band_limit(colour(dry, top_cut))


dry = scene()
out = record(dry)
materialize(out)
```